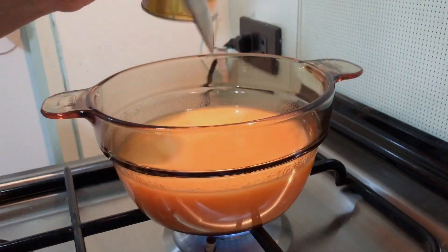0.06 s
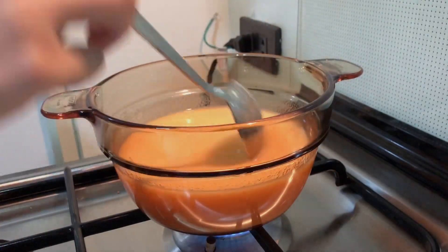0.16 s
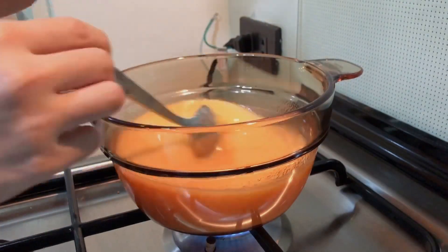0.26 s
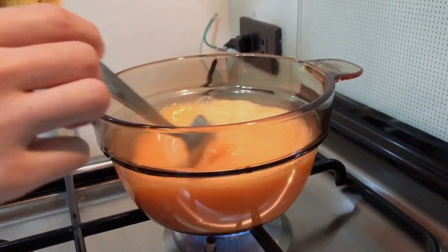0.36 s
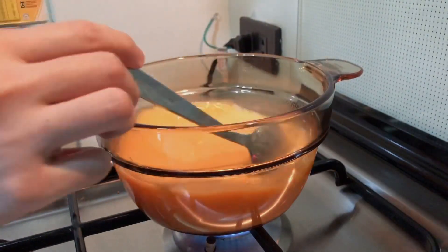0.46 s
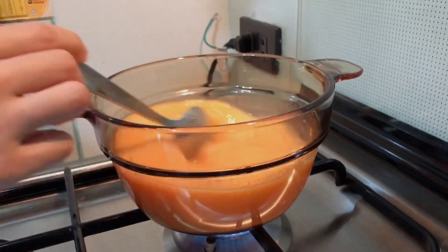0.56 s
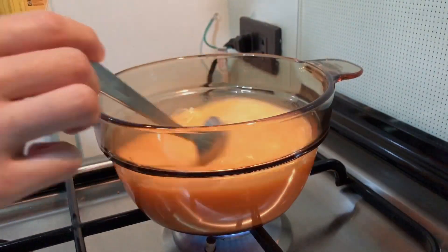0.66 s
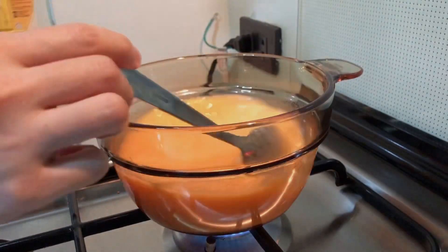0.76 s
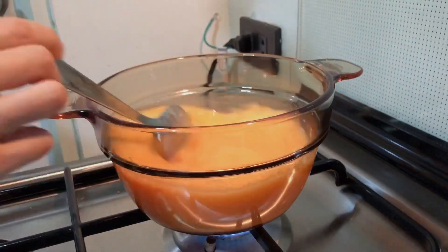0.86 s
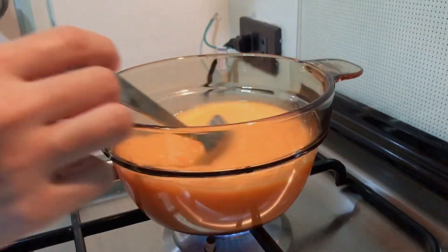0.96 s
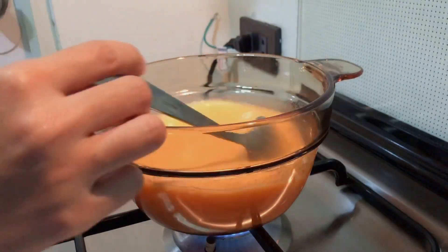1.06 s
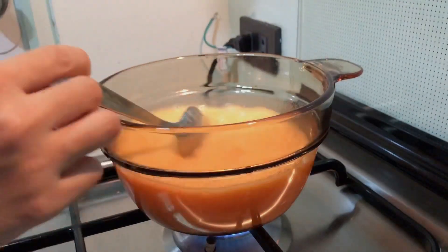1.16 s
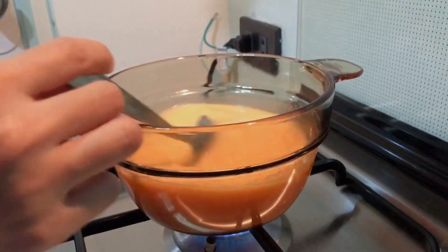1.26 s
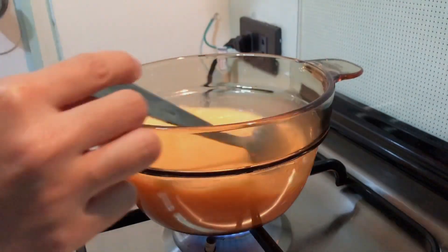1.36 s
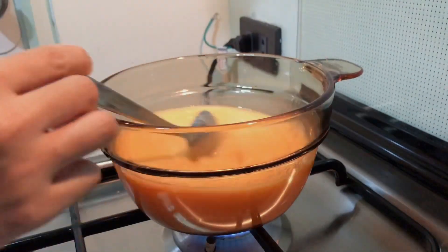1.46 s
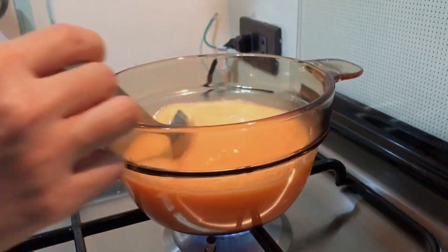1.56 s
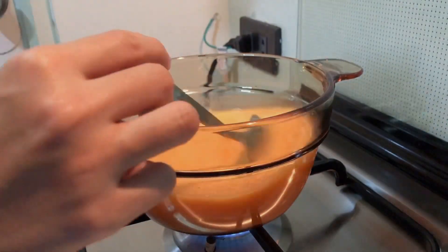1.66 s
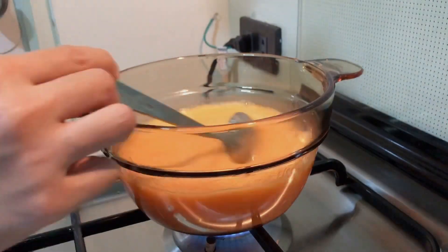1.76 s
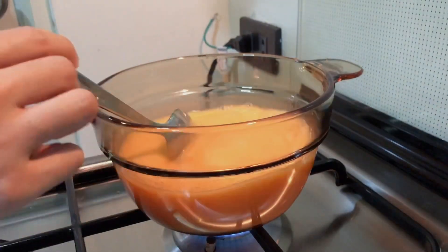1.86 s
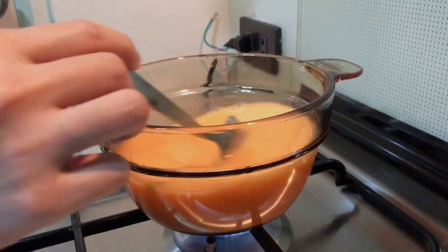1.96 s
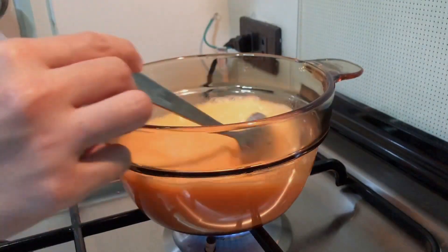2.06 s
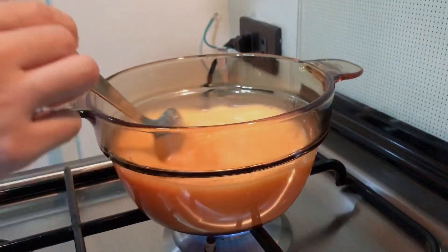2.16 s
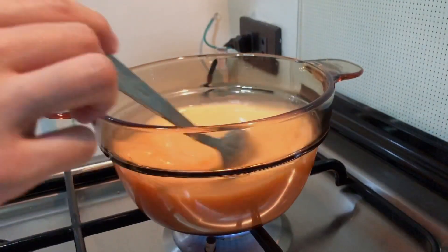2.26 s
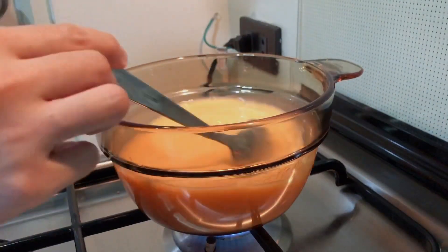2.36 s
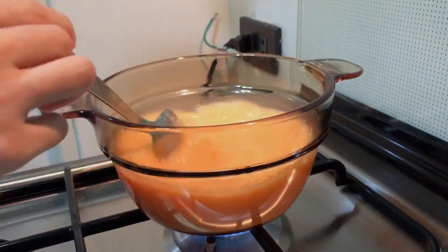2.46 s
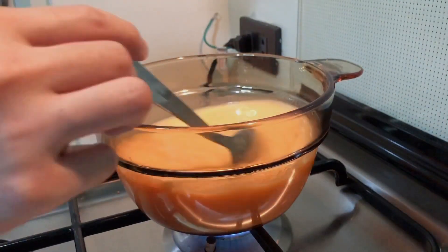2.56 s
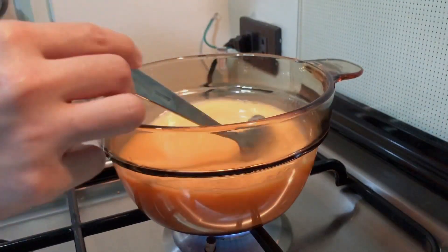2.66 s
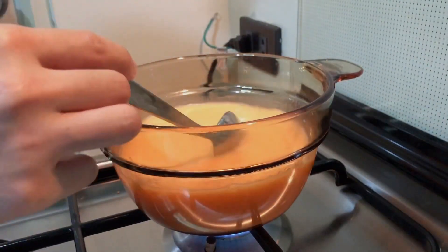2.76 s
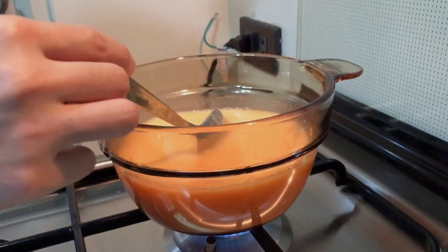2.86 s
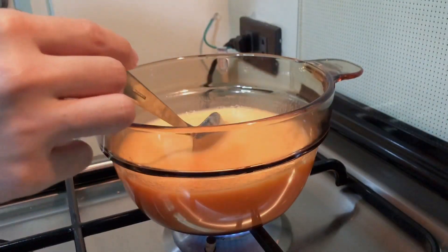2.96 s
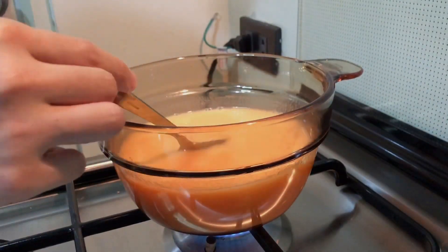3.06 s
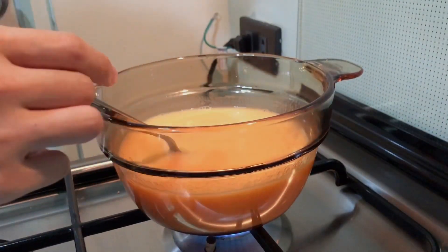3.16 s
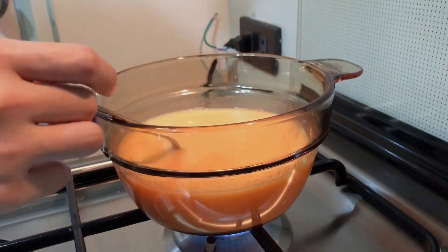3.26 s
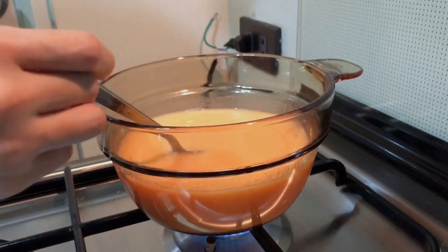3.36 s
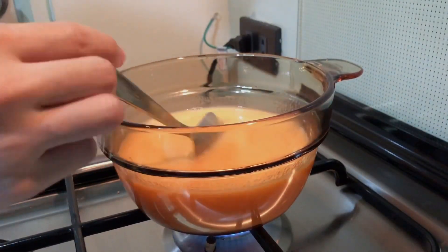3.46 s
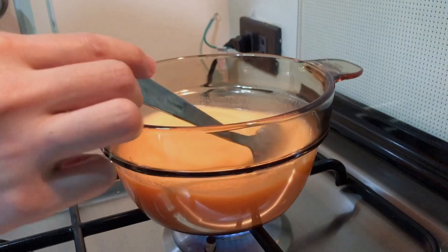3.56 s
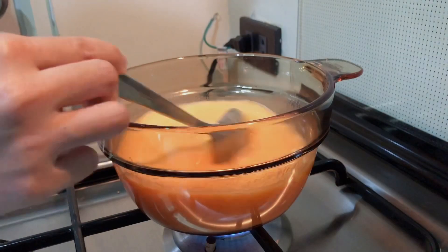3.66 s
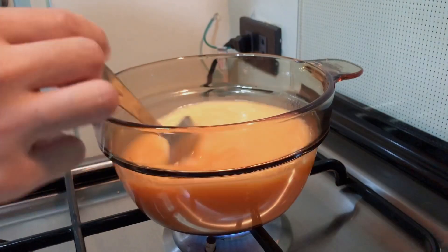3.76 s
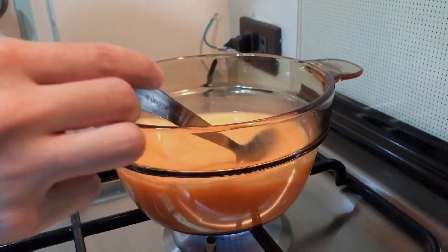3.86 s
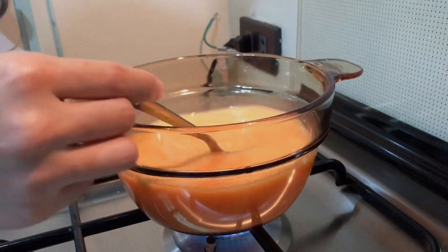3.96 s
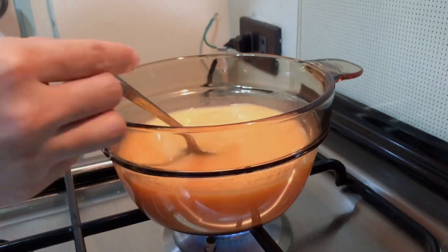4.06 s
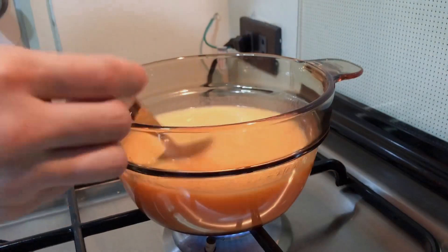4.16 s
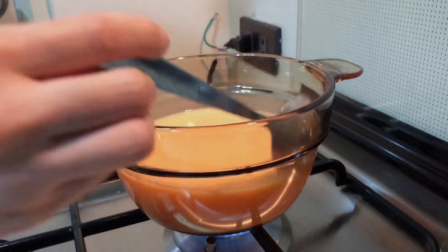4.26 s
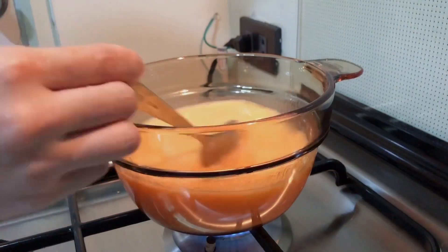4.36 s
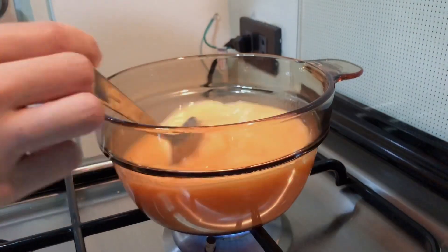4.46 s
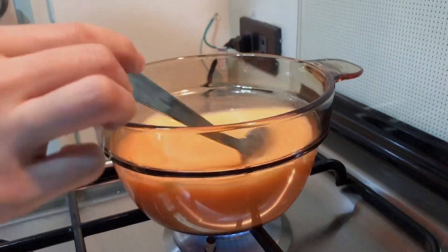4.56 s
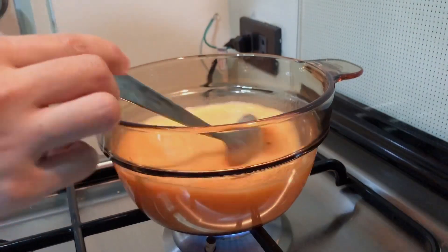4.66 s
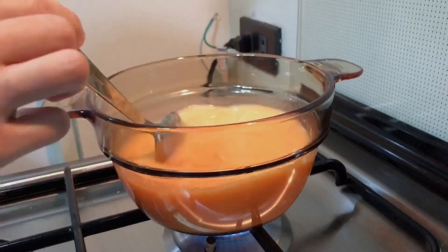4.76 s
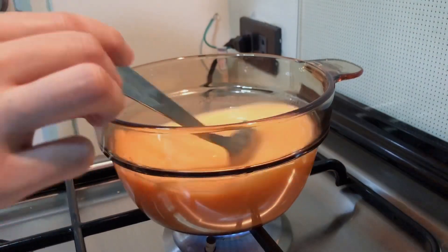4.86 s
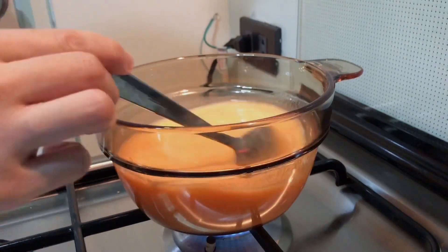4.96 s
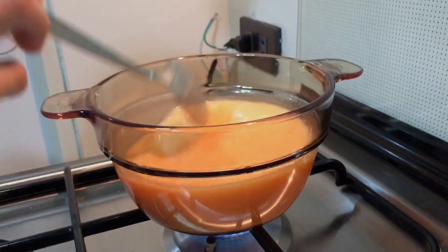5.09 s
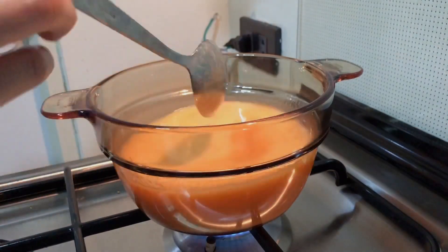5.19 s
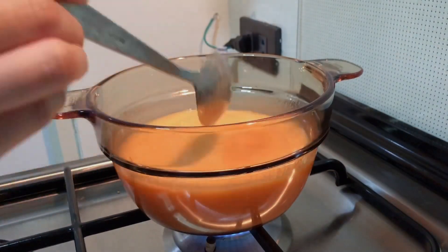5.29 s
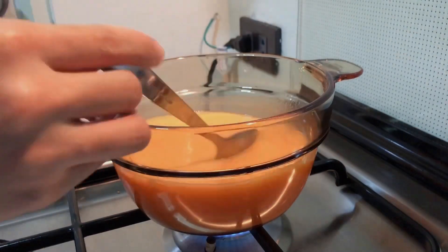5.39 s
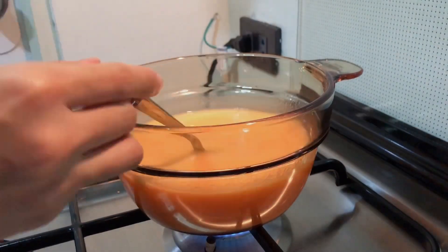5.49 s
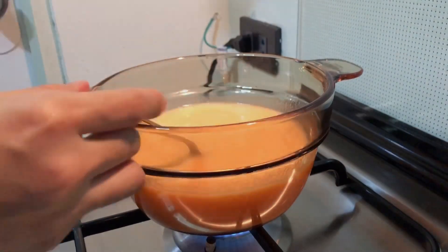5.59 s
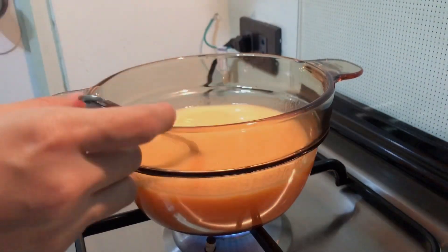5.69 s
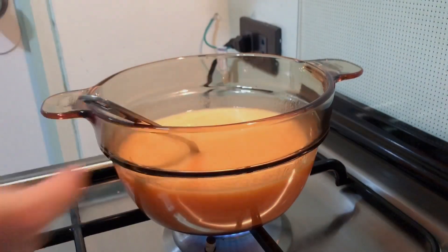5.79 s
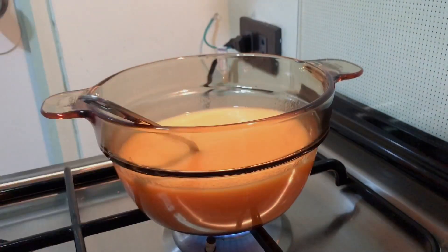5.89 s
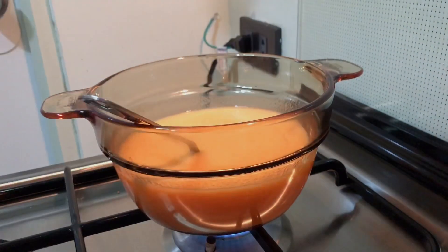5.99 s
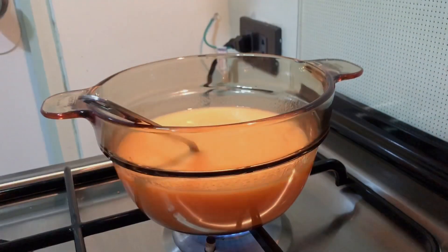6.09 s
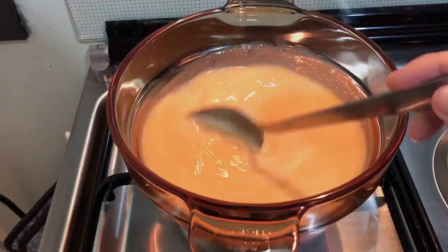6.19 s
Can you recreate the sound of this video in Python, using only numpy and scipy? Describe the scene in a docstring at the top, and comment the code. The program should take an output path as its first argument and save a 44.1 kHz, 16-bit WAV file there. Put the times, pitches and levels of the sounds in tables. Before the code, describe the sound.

Close, dry view of a small kitchen stove. A steel spoon stirs a thick liquid in a glass pan, with sharp high clinks, short scratchy skids and soft wet friction. A tin is set down with a clunk near two seconds. The spoon later drops on the rim and rattles briefly to rest. A faint tonal fan hum and flame hiss lie beneath, until a hollow clack ends it over changed background noise.

```python
"""Over fan tones and flame noise a steel spoon stirs a thick mixture in a glass pan: modes ring at each clink,
stick-slip noise makes the skids; wet friction, bubble ticks and pops fill the gaps. A tin is set down in two
contacts of decaying noise at 1.8 s, and a dull spoon scrape follows at 2.9 s. At 3.2 s and 5.5 s the spoon drops
on the rim and bounces to rest in ever closer strikes. Near 6.1 s noise, a low rumble with a narrow hiss near
7 kHz, replaces the hum, and a hollow clack rings a shell and its air. A kitchen echoes all but the background."""
import sys
import numpy as np
from scipy import signal
from scipy.fft import rfft, irfft, next_fast_len
from scipy.io import wavfile

SR = 44100
rng = np.random.default_rng(int(sys.argv[2]) if len(sys.argv) > 2 else 0)


def digitize_waveform(pressure):
    """Quantize a signal to 16-bit integers and store it at the path in sys.argv[1].

    Rows of a 2-D input are taken as channels; values are limited to [-1, 1].
    """
    field = np.atleast_2d(pressure).T
    bounded = np.clip(field, -1, 1)
    quanta = np.round(bounded * 32767).astype(np.int16)
    wavfile.write(sys.argv[1], SR, quanta)


N = 274743
TIME = np.arange(N) / SR
AGE = np.arange(SR // 2) / SR   # time since a blow [s]

# spoon strikes pan: (time [s], strength [dB], bowl pitch [Hz], crack centre [Hz],
# share into the glass [0-1], stem level above the strength [dB])
CLINK_EVENTS = [(0.1738, -21, 3700, 9500, 0.08, -0.5), (1.1244, -19.5, 3575, 8500, .42, -17),
                (1.2629, -31, 3660, 5230, 0.43, -8.5), (1.3096, -32, 3560, 9380, 0.06, -12),
                (1.4623, -32, 3810, 8250, 0.74, -2), (1.493, -27, 3465, 9200, 0.5, -5),
                (2.1039, -25, 3740, 10600, 0.54, -16), (3.0947, -35, 3650, 7710, .9, -5),
                (3.4215, -26.5, 3480, 4860, 0.03, -11.5), (4.1116, -29.5, 3400, 7970, 0.43, -6),
                (4.2509, -29.5, 3400, 7960, 1, 0.5), (4.2814, -20, 3486, 4760, 0.29, -11.5),
                (4.5532, -40, 3590, 9200, 0.2, -2.5), (4.8584, -34.5, 3500, 4480, 0.88, -2),
                (5.3624, -24, 3470, 6260, 0.21, -13.5)]
# loose spoon lands on the rim: (time [s], strength [dB], first gap [s],
# share into the glass [0-1], stem level above the strength [dB])
DROP_EVENTS = [(3.1674, -36, .0085, 0.62, -1), (5.5104, -31, .0222, 0.52, 4)]
# bowl of the spoon, damped by the liquid: (multiple of its pitch [1], level [dB], t60 [s])
BOWL_MODES = [(.905, -58, 0.0078), (.95, -13, 0.019), (1, 4.5, 0.023), (1.03, -8, 0.029),
              (1.065, -20, 0.015), (1.115, -13.5, 0.02), (1.28, -18, 0.025), (1.46, -12, 0.025),
              (1.55, -35.5, 0.0082)]
# dry stem of the spoon: (frequency [Hz], level [dB], t60 [s])
STEM_MODES = [(7560, -5.5, 0.042), (10810, -13.5, 0.082), (12000, 4.5, 0.014), (12960, -26, 0.004),
              (12400, -9, 0.0083), (13590, 15.5, 0.012), (15900, -7, 0.03), (15550, -17, 0.0091),
              (15900, -10, 0.0094)]
# glass pan: (frequency [Hz], level [dB], t60 [s], share of the slosh [0-1])
PAN_MODES = [(2970, -8, 0.034, 0.8), (2860, 4, 0.15, 0.65), (3140, -6.5, 0.64, 1), (3400, 4, 0.026, 0.2),
             (4040, -5, 0.03, 0.3), (5100, -5, 0.05, 0.8), (4600, -4, 0.076, .5), (6450, 0, 0.039, 0.1),
             (7570, 3, 0.029, 0), (9200, -21, 0.072, 0.7), (9200, 2, 0.051, 0.4)]
# fast-dying modes of the contact: (multiple of the crack centre [1], level [dB], t60 [s])
CONTACT_MODES = [(.93, 12, 0.019), (1, -1, 0.023), (1.04, 10, 0.023), (1.12, -23, 0.0083)]
# noise spectrum of a strike's crack: (frequency [Hz], density [dB per Hz])
CRACK_SPECTRUM = [(1500, 13.5), (2400, -47), (3000, 7.5), (5000, 8.5), (7000, 11), (9300, 9.5), (11000, 2),
                  (13500, -5.5), (16000, -17)]
# noise spectrum of the grate under the pan: (frequency [Hz], density [dB per Hz])
GRATE_SPECTRUM = [(120, -55), (250, 5), (450, 8), (800, 4.5), (1300, 8.5), (1800, -13.5), (3000, -35),
                  (6000, -8)]
# hard skids over wet glass: (time [s], length scale [s], bowl pitch [Hz], level [dB], rasp above that [dB])
HARD_SKIDS = [(.288, .001, 3090, -42.5, -9), (0.466, 0.0011, 3680, -43, -1), (.515, 0.0017, 3640, -40, -3),
              (0.689, 0.0025, 3610, -36, -14), (.746, 0.0021, 3510, -44, -26),
              (.826, 0.0047, 3680, -34.5, -3.5), (0.986, 0.004, 3216, -36.5, -11.5),
              (1.065, 0.001, 3660, -42.5, -26), (1.157, 0.0051, 3600, -41.5, -18),
              (1.428, .0017, 3430, -43, -22), (1.744, 0.0055, 3540, -42.5, -4),
              (2.063, 0.0056, 3400, -53, 9), (2.312, 0.0014, 3610, -39.5, -28),
              (2.401, 0.014, 3530, -40, 0), (2.618, 0.0079, 3450, -44.5, -8.5),
              (2.852, .005, 3200, -45.5, -15), (2.863, 0.0038, 3960, -42, -5.5),
              (2.972, 0.0068, 3400, -50, -6), (3.394, 0.0041, 3480, -49, -3),
              (3.509, 0.0037, 3660, -44, -0.5), (3.674, 0.007, 3447, -37, -4.5),
              (3.824, .0037, 3610, -46.5, -1), (3.87, 0.0054, 3440, -41, -1.5),
              (4.264, 0.011, 3570, -37, -4), (4.356, 0.0019, 3490, -43, -3.5),
              (4.39, 0.0043, 3550, -45, -3.5), (4.606, 0.005, 3360, -41.5, -13),
              (4.689, 0.0092, 3590, -39.5, 1.5), (4.872, 0.0029, 3390, -39, -4),
              (4.904, 0.046, 3450, -45.5, -1)]
# noise spectrum of a skid's rasp: (multiple of its centre [1], density [dB per Hz])
RASP_SPECTRUM = [(.25, -11), (.5, -27.5), (.82, -22), (1, 1), (1.2, -11), (1.9, -10.5), (3.001, -24)]
# stirring effort, before its contrast is widened: (time [s], level [dB])
STIR_EFFORT = [(0.0, -60), (0.23, -59), (0.34, -53.5), (0.69, -53.5), (1.13, -56.5), (1.3, -54.5),
               (1.43, -57), (1.76, -57), (1.92, -53), (2.4, -55), (2.79, -59.5), (3.19, -61.5),
               (3.48, -60.5), (3.57, -56.5), (4.04, -60.5), (4.81, -56.5), (5.03, -63), (5.9, -62.5)]
# noise spectrum of wet friction under the spoon: (frequency [Hz], density [dB per Hz])
FRICTION_SPECTRUM = [(2000, -49), (3000, -28), (3700, -7.5), (4400, 8.5), (5100, 1), (6300, 6), (8000, 3),
                     (9600, 11), (11200, 5.5), (13500, 9), (16000, 3)]
# air pockets opening in the wake of the spoon: (time [s], frequency [Hz], level [dB], t60 [s])
POP_EVENTS = [(.287, 6260, -42, 0.0047), (2.074, 2040, -43.5, 0.016), (3.61, 2320, -47, .022)]
# two contacts of a tin, then a dull scrape of the spoon:
# (time [s], level [dB], treble tilt [dB per octave], low edge [Hz], slide delay [s])
TIN_AND_SCRAPE_EVENTS = [(1.8017, -24.5, 2.1, 337, .028), (1.9556, -33, -1, 780, .044),
                         (2.872, -45, -4, 1660, 0.015)]
# noise spectrum of the tin and the scrape, before the tilt: (frequency [Hz], density [dB per Hz])
TIN_AND_SCRAPE_SPECTRUM = [(120, -27), (300, 4.5), (700, 1.5), (1300, 3.5), (2000, -1.5), (2800, -5),
                           (4200, -1), (6500, -5), (8000, -1.5), (11000, -8), (14500, -8), (16000, -13)]
# impacts of the hollow clack: (time [s], shell level [dB], cavity level [dB])
CLACK_EVENTS = [(6.134, -25.5, -49), (6.144, -44, -25.5), (6.1524, -33, -39)]
# hard shell of the clack, before it rocks: (frequency [Hz], level [dB], t60 [s])
SHELL_MODES = [(337, -17.5, 0.081), (1405, -18.5, 0.13), (1685, -10, 0.031), (1680, -3, 0.046),
               (1713, -7.5, 0.092), (1840, -27, 0.047), (1980, -12, 0.056), (2350, -6.5, 0.025),
               (2700, -8, 0.03), (3290, -9, 0.01)]
# air inside the shell: (frequency [Hz], level [dB], t60 [s])
CAVITY_MODES = [(784.6, 2, 0.064), (847, -7, 0.03), (760, -19, 0.091)]
# noise spectrum of the clack's impact: (frequency [Hz], density [dB per Hz])
THOCK_SPECTRUM = [(250, -43), (700, -3), (1700, 4.5), (2600, -8), (3600, -12.5), (5000, -14.5), (9000, -24),
                  (16000, -33)]
# reflections of the kitchen: (frequency [Hz], density [dB per Hz])
ROOM_SPECTRUM = [(150, -15), (500, 17), (1300, 8.5), (3500, 7.5), (8000, 4), (16000, 0)]
# fan tones, before they waver: (frequency [Hz], rms level [dB])
HUM_TONES = [(202, -72), (254, -72), (354.5, -57.5), (403.3, -61.5), (486, -71), (509, -75.5),
             (617.5, -63.5), (708.5, -66.5), (961, -70), (1255, -73.5), (1523, -78)]
# noise spectrum of the flame: (frequency [Hz], density [dB per Hz])
FLAME_SPECTRUM = [(30, -21), (80, -28.5), (125, -15), (185, 2.5), (330, 5), (560, 1), (800, 4),
                  (1300, -1.5), (1700, -4), (3400, -7), (5500, -13.5), (10000, -15.5), (16000, -15)]
# closing noise, a low rumble with a narrow hiss near 7 kHz: (frequency [Hz], density [dB per Hz])
CLOSING_SPECTRUM = [(25, -15), (90, 5.5), (200, 2.5), (400, -6.5), (900, -1.5), (1600, -11.5), (3000, -15),
                    (6300, -22), (7200, 0), (8100, -22), (12000, -27), (16000, -28)]

SLOSH_SHIFT, SLOSH_HZ = .009, 4.1   # liquid climbing and leaving the wall bends the pitch of the glass
GRIP_SHIFT = 0.0053                 # the fingers detune the stem from blow to blow
# each gap keeps this share of the last; a gap below REST_GAP_S ends the bouncing
BOUNCE_KEEPS, BOUNCE_LOSS_DB, REST_GAP_S = .805, 1.98, .0055
# the spoon tumbles, so each bounce has other pitches
DROP_BOWL_HZ, DROP_CRACK_HZ, TUMBLE_SHIFT = 3644, 6780, 0.096
BOWL_HZ, DIP_SHIFT = 3473, 0.04     # usual bowl pitch, and its spread with the depth of the spoon
RASP_HZ, RASP_SPREAD_OCT = 5030, 0.21
LIGHT_DB, LIGHT_SPREAD_DB, LIGHT_S = -47, 3, 0.0018   # light skids at full effort
LIGHT_RASP_DB, LIGHT_RASP_RISE_OCT = -7, 1.26
EFFORT_CONTRAST, GRIT_DB = 1.7, -57.5
WHINE_HZ, WHINE_DB, FLAME_DB = 4270, -68, -57.5
HUM_END_S = 6.082
CUTOFF_HZ = 15850


def clinks():
    """Impact excitation: the spoon meets the bottom or the wall of the pan."""
    out = np.zeros(N)
    for s, db, bowl_hz, crack_hz, share, stem_db in CLINK_EVENTS:
        add(out, s, strike(db, bowl_hz, crack_hz, share, stem_db))
    return out


def drops(max_touches=8, buzz_db=-6.0, buzz_t60=0.044):
    """Inelastic bouncing: touches get closer and softer, each prolonged by a buzz on the rim."""
    out = np.zeros(N)
    for s, db, gap, share, stem_db in DROP_EVENTS:
        for k in range(max_touches):
            bowl, crack = 1 + TUMBLE_SHIFT * rng.standard_normal(2)
            touch_db = db - BOUNCE_LOSS_DB * k
            touch = strike(touch_db, DROP_BOWL_HZ * bowl, DROP_CRACK_HZ * crack, share, stem_db)
            buzz = burst(buzz_t60)
            buzz /= np.linalg.norm(buzz)
            buzzing = signal.fftconvolve(touch, buzz)[:len(touch)]
            add(out, s, touch + from_db(buzz_db) * buzzing)
            if gap < REST_GAP_S:
                break
            s += gap
            gap *= BOUNCE_KEEPS
    return out


def strike(db, bowl_hz, crack_hz, share, stem_db):
    """Modal superposition: a blow cracks, rings bowl, glass and stem, and shakes the grate."""
    share = np.clip(share, .01, .99)
    grip = rng.uniform(-1, 1)
    slosh = SLOSH_SHIFT * drift(SLOSH_HZ)[:len(AGE)]
    pan_pitch = 1 + np.array(PAN_MODES)[:, 3:] * slosh
    sound = (1 - share) * from_db(-1.0) * ring(BOWL_MODES, bowl_hz)
    sound += share * from_db(-9.0) * ring(PAN_MODES, pan_pitch)
    sound += from_db(-9.0) * blow(colour(burst(t60=0.012), CRACK_SPECTRUM))
    sound += from_db(-10.5) * ring(CONTACT_MODES, crack_hz)
    sound += from_db(stem_db - 0.5) * ring(STEM_MODES, 1 + GRIP_SHIFT * grip)
    sound += from_db(stem_db - 7.0) * blow(low_cut(burst(t60=0.01), hz=8150))   # snap of the stem
    thud = blow(colour(burst(t60=0.14), GRATE_SPECTRUM))
    return from_db(db) * (low_cut(sound, hz=2230) + from_db(-18.0 + 0.32 * stem_db) * thud)


def skids(light_count=22):
    """Intermittent friction: hard skids, and light ones that are denser and louder with effort."""
    out, drive = np.zeros(N), effort()
    for s, length_s, bowl_hz, db, rasp_db in HARD_SKIDS:
        rasp_hz = RASP_HZ * 2 ** (RASP_SPREAD_OCT * rng.standard_normal())
        add(out, s, from_db(db) * skid(length_s, bowl_hz, rasp_hz, rasp_db))
    travel = np.cumsum(drive) / drive.sum()
    for k in range(light_count):
        place, point = rng.random(2)
        size, dip = rng.standard_normal(2)
        i = np.searchsorted(travel, (k + place) / light_count)   # equal steps of effort, not of time
        bowl_hz = BOWL_HZ * (1 + DIP_SHIFT * dip)
        rasp_hz = RASP_HZ * 2 ** (LIGHT_RASP_RISE_OCT * point)
        level = drive[i] * from_db(LIGHT_DB + LIGHT_SPREAD_DB * size)
        add(out, i / SR, level * skid(LIGHT_S, bowl_hz, rasp_hz, LIGHT_RASP_DB))
    return low_cut(out, hz=2600)


def skid(length_s, bowl_hz, rasp_hz, rasp_db, glass_db=-17.5, drag_db=-23.0, drag_s=0.047):
    """Stick-slip excitation: a swelling, fading rough force shakes the spoon and faintly the pan."""
    age = AGE[:SR // 8]
    phase = age / max(length_s, 1e-3)
    swell = phase ** 2 * np.exp(-2.6 * phase)
    envelope = swell / swell.max() + from_db(drag_db) * np.exp(-age / drag_s)
    push = rng.standard_normal(len(age)) ** 3 * envelope   # cubing makes the force spiky
    resonance = ring(BOWL_MODES, bowl_hz) + from_db(glass_db) * ring(PAN_MODES)
    body = signal.fftconvolve(resonance, push)
    rough = signal.fftconvolve(burst(t60=0.00097), push)
    rasp = colour(rough, np.array(RASP_SPECTRUM) * [rasp_hz, 1])
    return blow(body) + from_db(rasp_db - 1.0) * blow(rasp)


def grit():
    """Wet sliding friction: uneven hiss, bubble ticks and snatches of bowl tone follow the effort."""
    tick_db, friction_db, rub_db = -4.0, -4.0, 1.0
    ticks, age = np.zeros(N), AGE[:SR // 100]
    tick_count = int(560 * TIME[-1])   # 560 per second
    for s, size, height in rng.random((tick_count, 3)) * [TIME[-1], 1, 1]:
        hz = 4000 * 3.54 ** height
        fade = from_db(-60 * age * hz / 72.0)   # 60 dB in 72 cycles: small bubbles die sooner
        excess = -np.log(size + .03)            # most are small, a few stand out
        add(ticks, s, from_db(7.0 * excess) * np.sin(2 * np.pi * hz * age) * fade)
    rub_turns = np.cumsum(BOWL_HZ + 110 * drift(70.0)) / SR
    rub = drift(180) * np.sin(2 * np.pi * rub_turns) * from_db(1.9 * np.minimum(drift(60), 2))
    friction = rng.standard_normal(N) * from_db(5.0 * (drift(60) + drift(33)))
    mixture = from_db(tick_db) * rms_one(ticks) + from_db(friction_db) * rms_one(friction)
    wet = colour(mixture, FRICTION_SPECTRUM)
    return from_db(GRIT_DB) * effort() * low_cut(wet + from_db(rub_db) * rms_one(rub), hz=2340)


def effort():
    """Amplitude envelope: stirring effort over time, 1 at its hardest."""
    s, db = np.transpose(STIR_EFFORT)
    return from_db(EFFORT_CONTRAST * np.interp(TIME, s, db - db.max()))


def pops():
    """Bubble resonance: each small air pocket rings as one decaying sine when it opens."""
    out = np.zeros(N)
    for s, hz, db, t60 in POP_EVENTS:
        add(out, s, from_db(db) * blow(np.sin(2 * np.pi * hz * AGE) * decay(t60)))
    return low_cut(out, hz=1200)


def tin_and_scrape(chatter_db=4.5, slide_swell_s=0.013):
    """Dense modal decay: bursts and a swelling slide form two tin contacts, then a dull spoon scrape."""
    out = np.zeros(N)
    for s, db, tilt, edge_hz, slide_s in TIN_AND_SCRAPE_EVENTS:
        slide = burst(t60=.15) * (1 - np.exp(-AGE / slide_swell_s))
        # delay [s], level [dB], contact noise
        parts = [(0, 0.0, burst(t60=0.024)), (.004, -6.5, burst(t60=0.093)), (slide_s, -9.0, slide)]
        for delay, part_db, contact in parts:
            rough = contact * from_db(chatter_db * drift(480)[:len(AGE)])
            sound = blow(low_cut(colour(rough, TIN_AND_SCRAPE_SPECTRUM, tilt), edge_hz))
            add(out, s + delay, from_db(db + part_db) * sound)
    return out


def clack(thock_db=-0.5, swell_s=0.0058, rock_shift=0.038):
    """Cavity resonance: a knocked shell rattles, and the air in its hollow swells and rings."""
    out = np.zeros(N)
    for s, shell_db, cavity_db in CLACK_EVENTS:
        hollow = np.zeros(len(AGE))
        for hz, db, t60 in CAVITY_MODES:
            # phase runs on from impact to impact
            hollow += from_db(db) * np.sin(2 * np.pi * hz * (AGE + s)) * decay(t60)
        air = blow(hollow * (1 - np.exp(-AGE / swell_s)))
        rocking = rng.uniform(-1, 1)
        thock = blow(colour(burst(t60=0.031), THOCK_SPECTRUM))
        knock = ring(SHELL_MODES, 1 + rock_shift * rocking) + from_db(thock_db) * thock
        add(out, s, from_db(shell_db) * knock + from_db(cavity_db) * air)
    return low_cut(out, hz=198)


def kitchen(x, near_db=-10.0, far_db=-19.5):
    """Reverberation by convolution: early scatter from hob and splashback, then a short room tail."""
    near_onset = np.clip((AGE - .002) / 0.00023, 0, 1)
    far_onset = np.clip((AGE - .006) / 0.012, 0, 1)
    near = blow(colour(burst(t60=.05) * near_onset, ROOM_SPECTRUM))
    far = blow(colour(burst(t60=0.19) * far_onset, ROOM_SPECTRUM))
    echoes = (from_db(near_db) * near + from_db(far_db) * far) / np.sqrt(SR / 100)   # blow() units to energy
    return x + signal.fftconvolve(x, echoes)[:N]


def background(closing_db=-49.0, waver_hz=1.617, flutter_db=1.5):
    """Tones in noise: fan tones over the flame's rush, then a low rumble with a narrow hiss near 7 kHz."""
    steady = from_db(FLAME_DB) * rms_one(colour(rng.standard_normal(N), FLAME_SPECTRUM))
    for hz, db in HUM_TONES + [(WHINE_HZ, WHINE_DB)]:
        turns = np.cumsum(hz + waver_hz * drift(5.91)) / SR
        level = from_db(db + flutter_db * drift(4.2)) * np.sqrt(2)   # rms to peak
        steady += level * np.sin(2 * np.pi * turns)
    closing = from_db(closing_db) * rms_one(colour(rng.standard_normal(N), CLOSING_SPECTRUM))
    late = np.clip((TIME - HUM_END_S) / 0.004, 0, 1)
    return (1 - late) * steady + late * closing


def ring(modes, pitch=1):
    """Modal synthesis: decaying sines at frequencies times pitch, with chance strengths and signs."""
    hz, db, t60 = np.transpose(modes)[:3, :, None]
    chance = rng.standard_normal((2, len(modes), 1))   # each point of contact excites the modes otherwise
    gain = from_db(db + 2.5 * chance[0]) * np.sign(chance[1])
    turns = np.cumsum(hz * pitch * np.ones(len(AGE)), axis=1) / SR
    return blow(np.sum(gain * np.sin(2 * np.pi * turns) * decay(t60), axis=0))


def burst(t60):
    """High modal density: a crowd of short-lived modes is noise that dies away."""
    return rng.standard_normal(len(AGE)) * decay(t60)


def decay(t60):
    """Exponential damping: a mode falls 60 dB in t60 seconds."""
    return from_db(-60 * np.minimum(AGE / np.maximum(t60, 1e-3), 5))


def drift(rate_hz):
    """Low-passed noise: slow chance with spread 1, computed at every 40th sample."""
    r = np.exp(-80 * np.pi * rate_hz / SR)
    noise = rng.standard_normal(N // 40 + 2002)
    slow = rms_one(signal.lfilter([1], [1, -2 * r, r * r], noise)[2000:])   # skip the filter's start
    return np.interp(np.arange(N) / 40, np.arange(len(slow)), slow)


def colour(x, points, tilt_db=0):
    """Minimum-phase filtering: a causal filter with the given spectrum, tilted per octave."""
    size = 2 * next_fast_len(len(x) // 2 + 2048)
    octave = np.log2(np.maximum(np.fft.rfftfreq(size, 1 / SR), 1))
    hz, db = np.transpose(points)
    tilt = tilt_db * np.maximum(octave, np.log2(hz[0]))
    cepstrum = irfft(np.log(from_db(np.interp(octave, np.log2(hz), db) + tilt)))
    cepstrum[1:size // 2] *= 2   # fold onto positive time
    cepstrum[size // 2 + 1:] = 0
    return irfft(rfft(x, size) * np.exp(rfft(cepstrum)))[:len(x)]


def low_cut(x, hz):
    """Radiation efficiency: small things radiate no bass."""
    return signal.sosfilt(signal.butter(3, hz, "high", fs=SR, output="sos"), x)


def from_db(db):
    """Logarithmic level: decibels to amplitude ratio."""
    return 10 ** (np.asarray(db) / 20)


def rms_one(x):
    """Mean power: scale to rms 1."""
    return x / np.sqrt(np.mean(x ** 2) + 1e-20)


def blow(x):
    """Signal energy: scale a short sound to the energy of 10 ms at rms 1."""
    return x / np.sqrt(np.sum(x ** 2) / (SR / 100) + 1e-20)


def add(out, s, x):
    """Linear superposition: mix x into out from time s on."""
    i = max(int(s * SR), 0)
    out[i:i + len(x)] += x[:max(N - i, 0)]


def scene():
    """Superposition: all sounds at the stove reverberate in the kitchen, over the background."""
    stove = clinks() + drops() + skids() + grit() + pops() + tin_and_scrape() + clack()
    return (kitchen(stove) + background())[None]


def record(dry):
    """Band limiting: an elliptic low-pass cuts the top steeply."""
    return signal.sosfilt(signal.ellip(10, .3, 80, CUTOFF_HZ, fs=SR, output="sos"), dry)


dry = scene()
out = record(dry)
digitize_waveform(out)
```